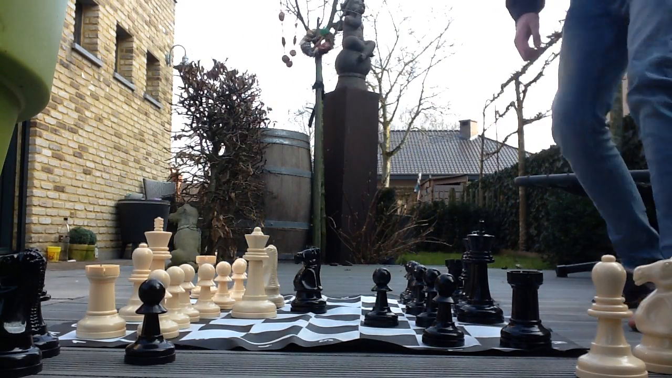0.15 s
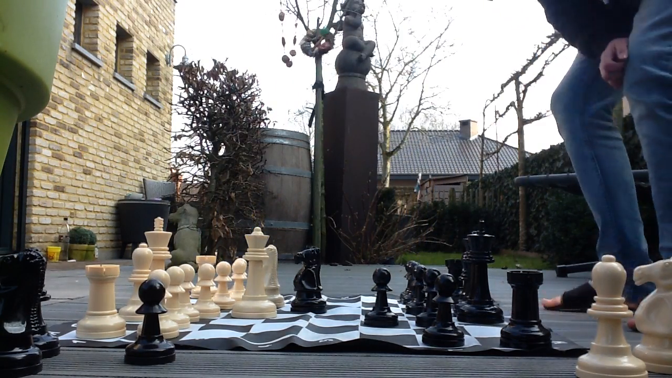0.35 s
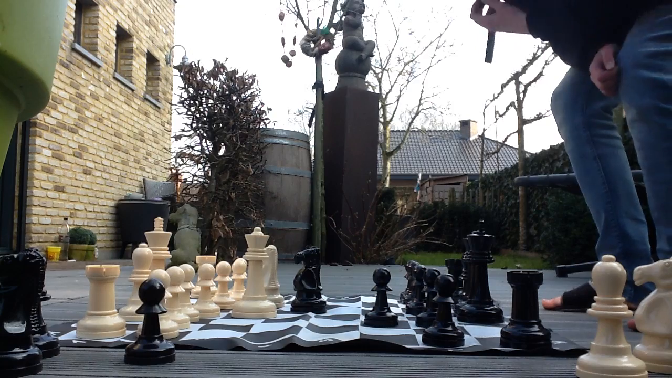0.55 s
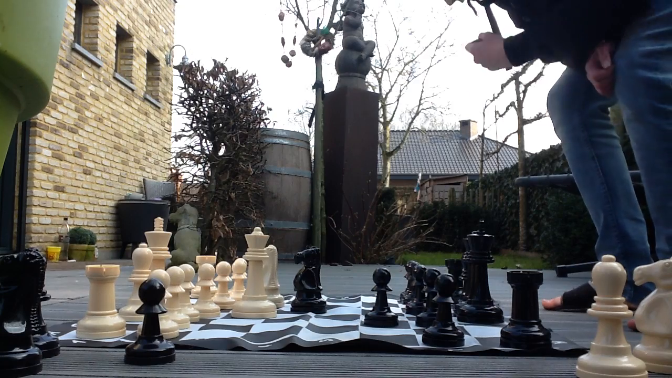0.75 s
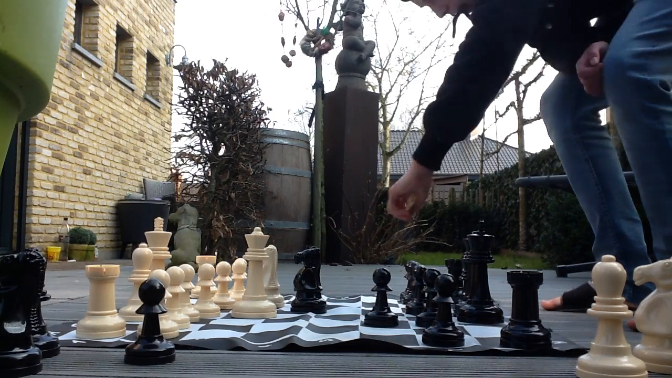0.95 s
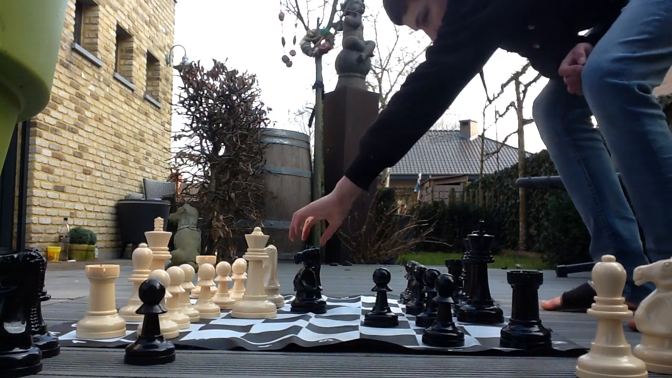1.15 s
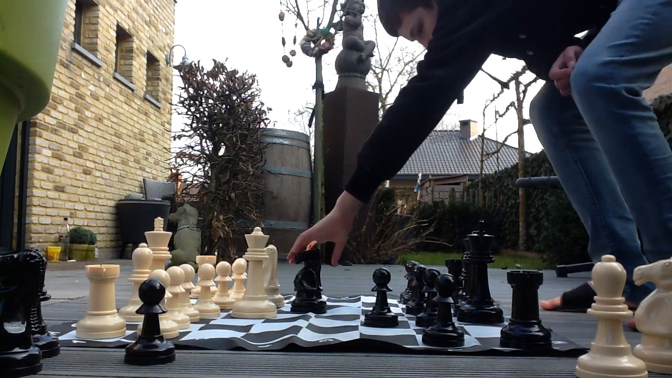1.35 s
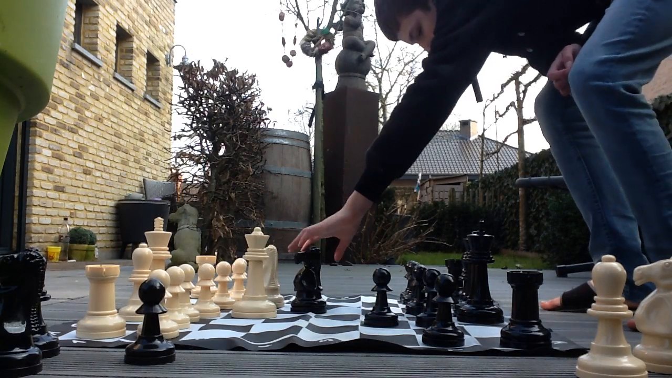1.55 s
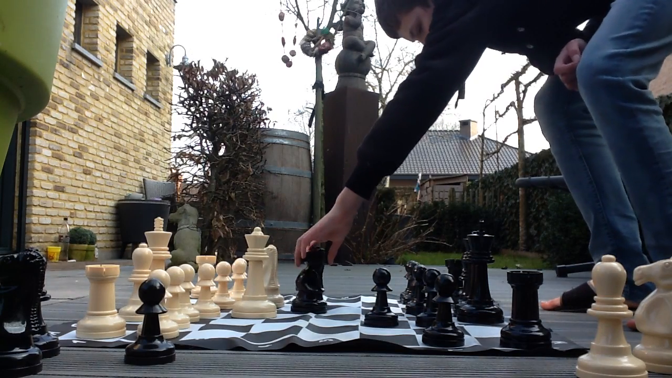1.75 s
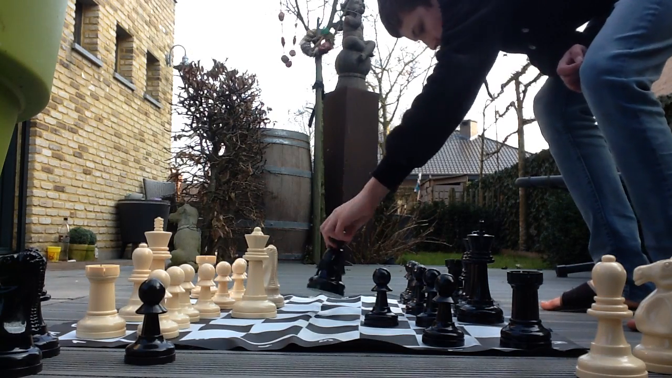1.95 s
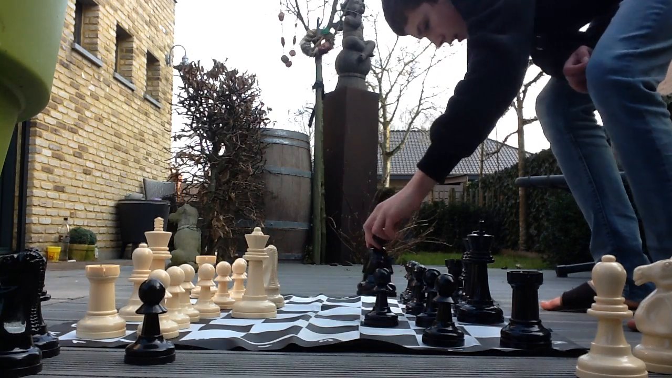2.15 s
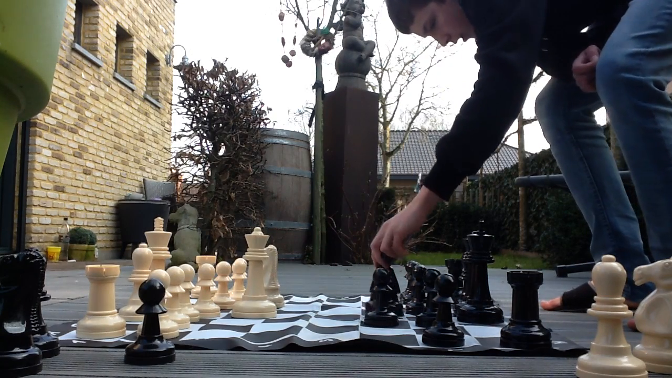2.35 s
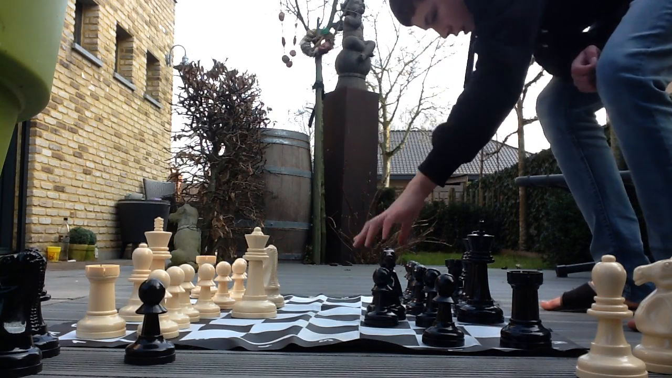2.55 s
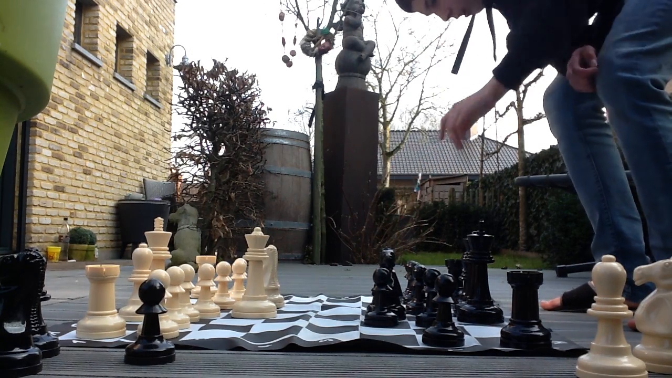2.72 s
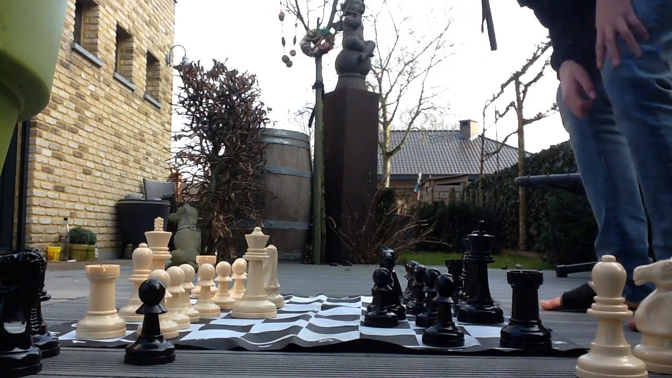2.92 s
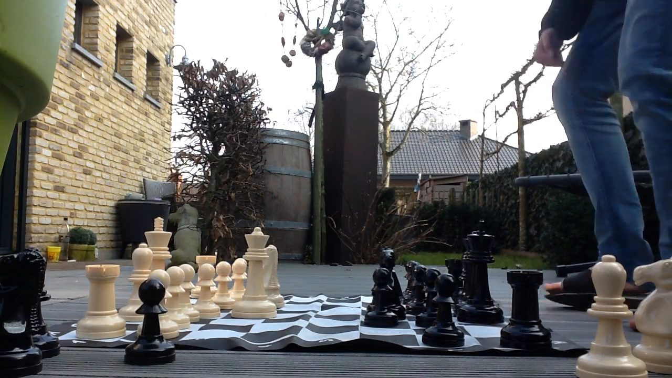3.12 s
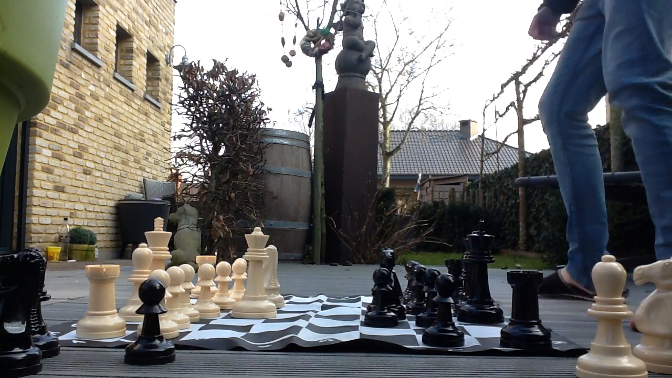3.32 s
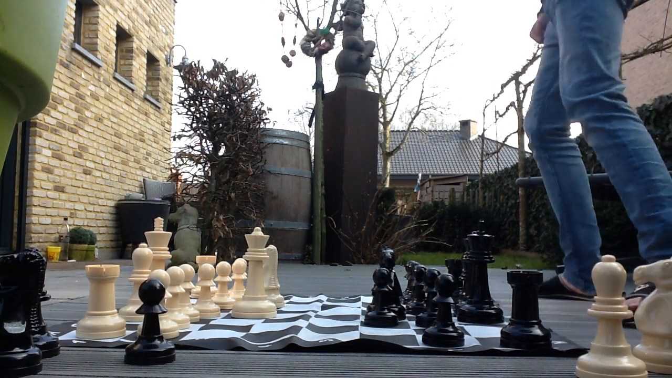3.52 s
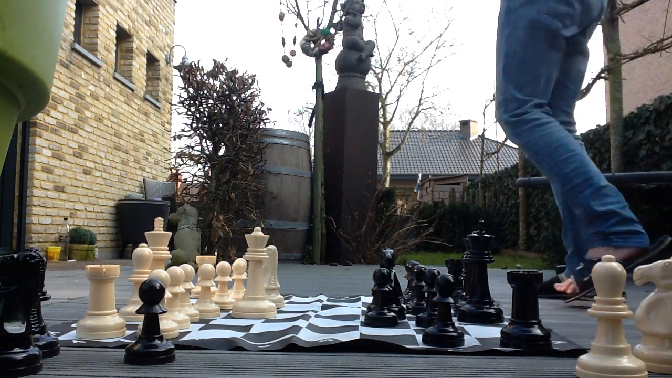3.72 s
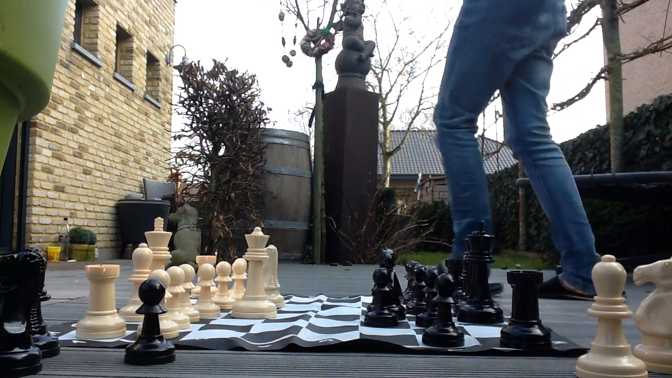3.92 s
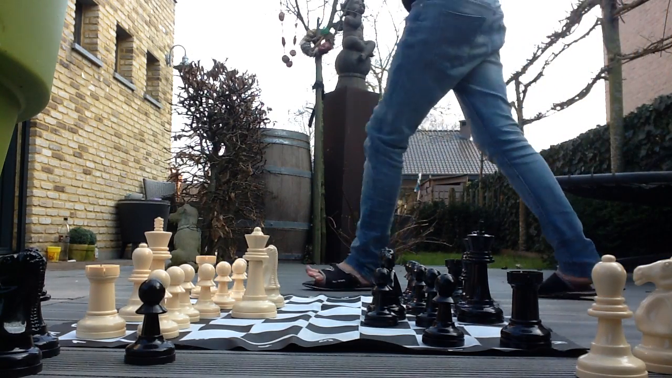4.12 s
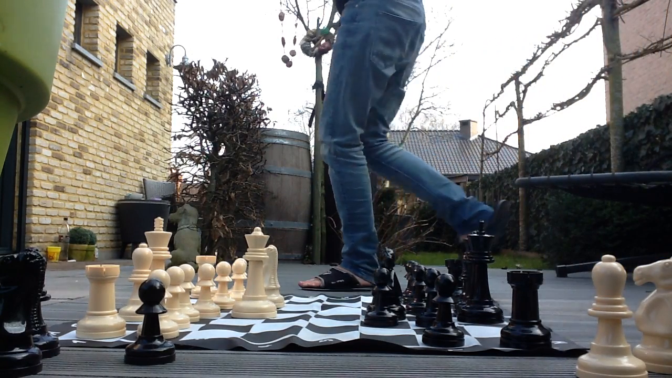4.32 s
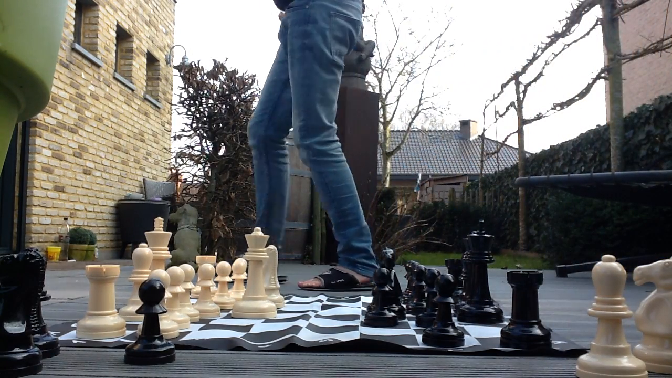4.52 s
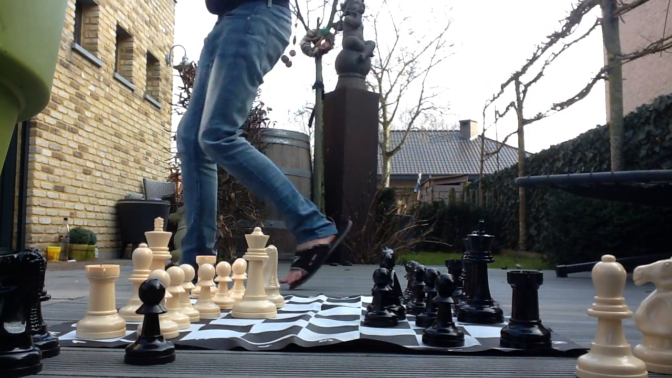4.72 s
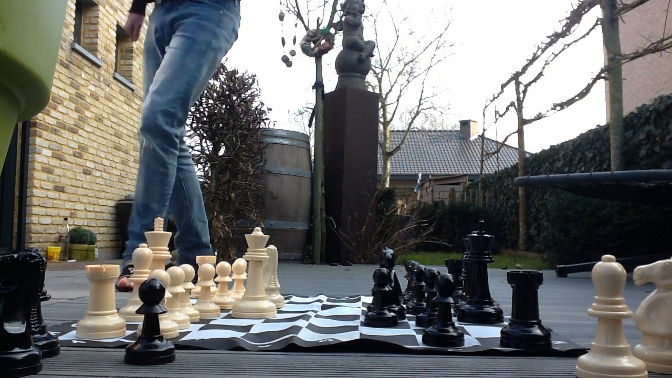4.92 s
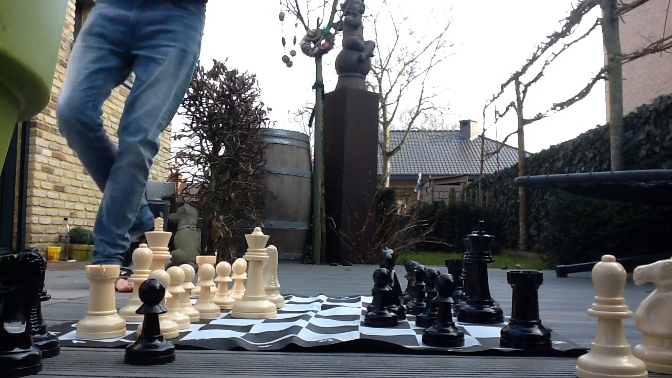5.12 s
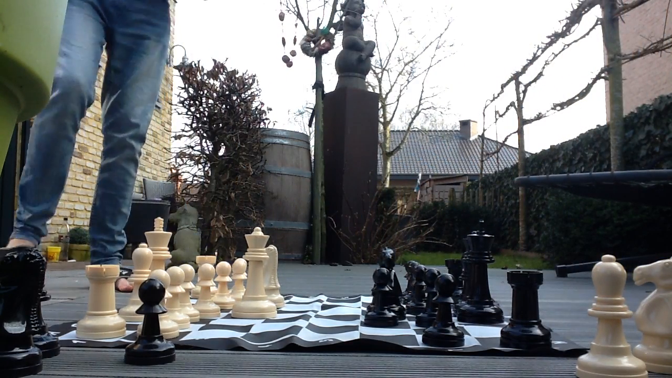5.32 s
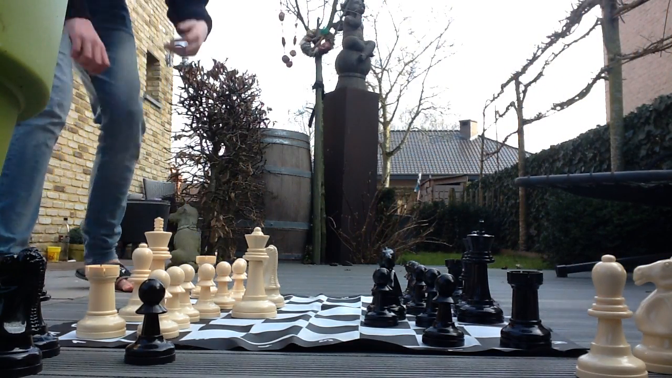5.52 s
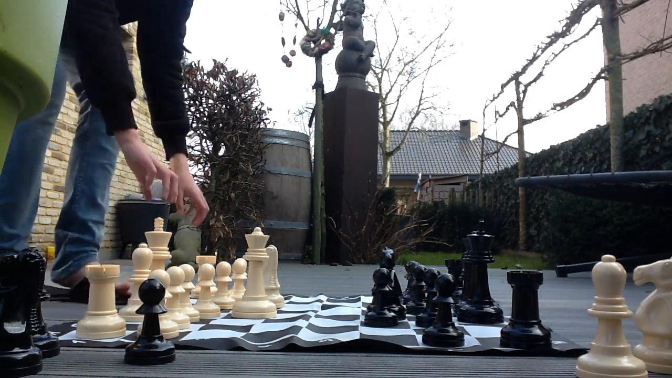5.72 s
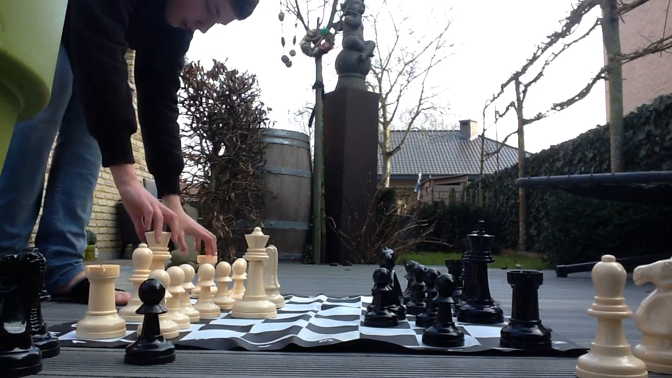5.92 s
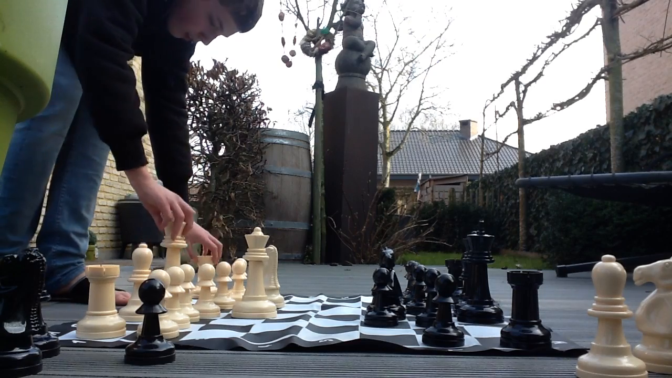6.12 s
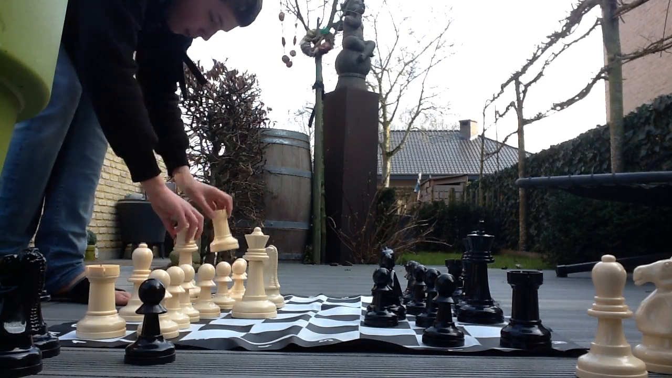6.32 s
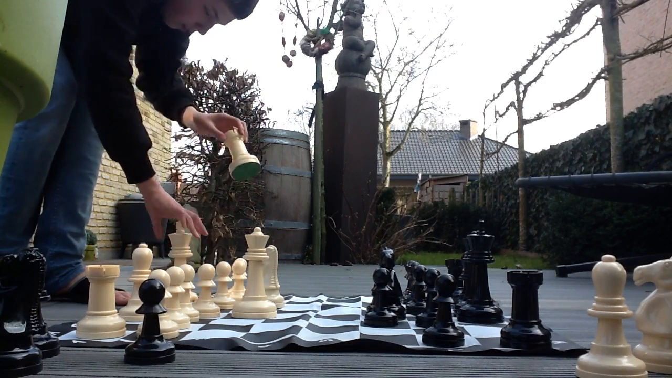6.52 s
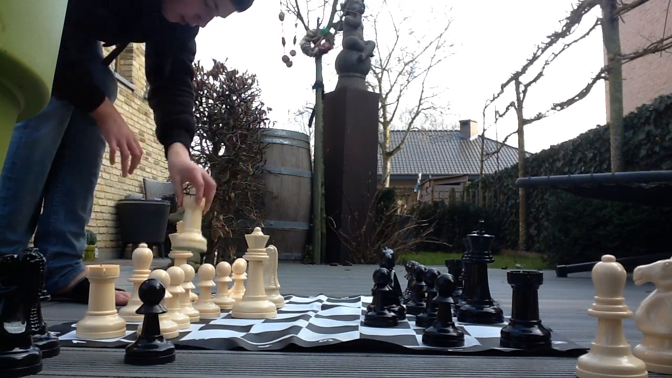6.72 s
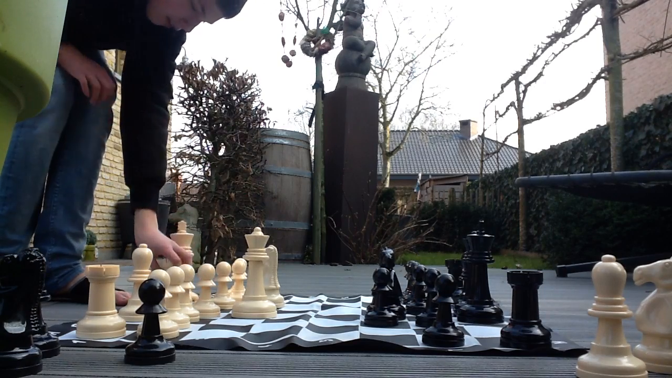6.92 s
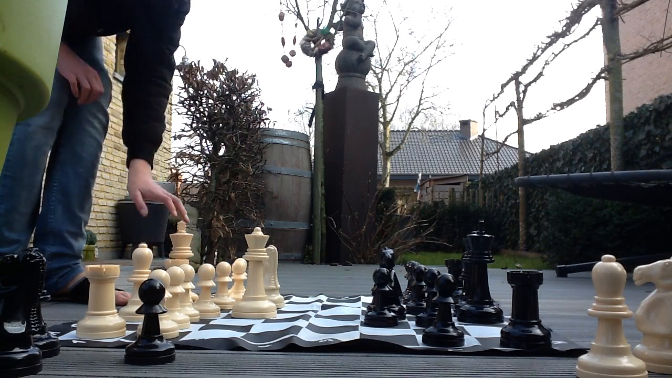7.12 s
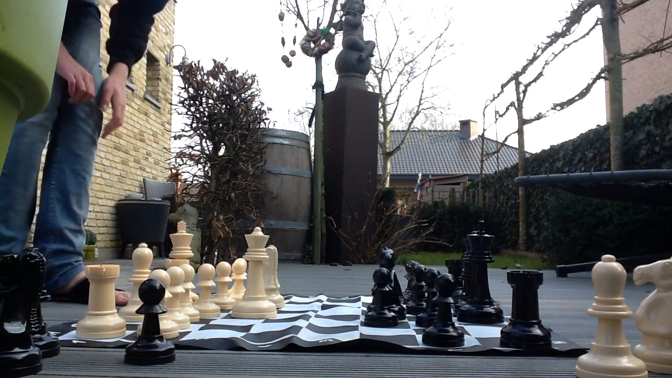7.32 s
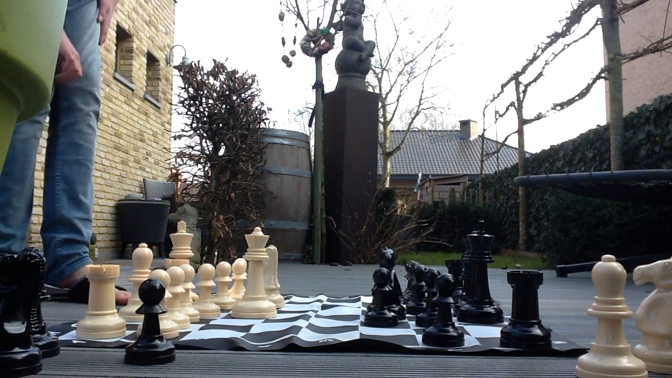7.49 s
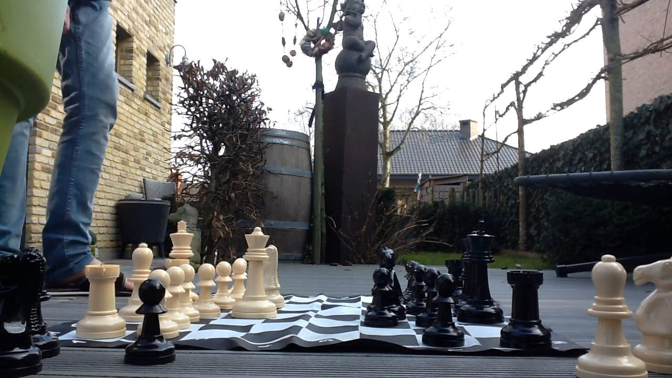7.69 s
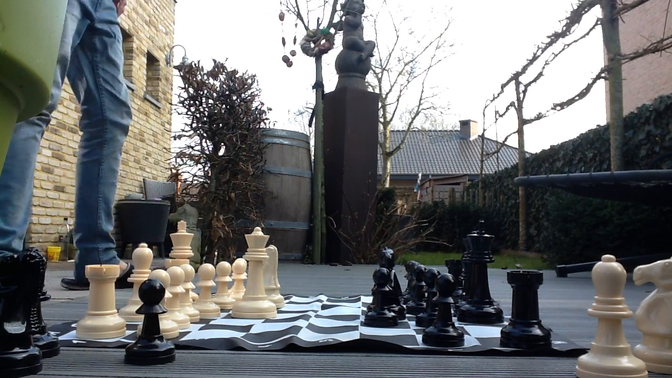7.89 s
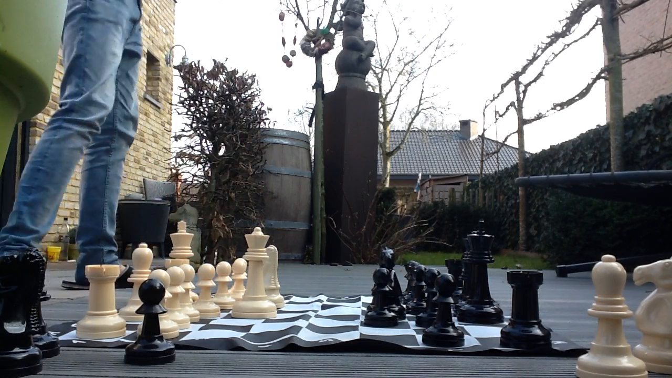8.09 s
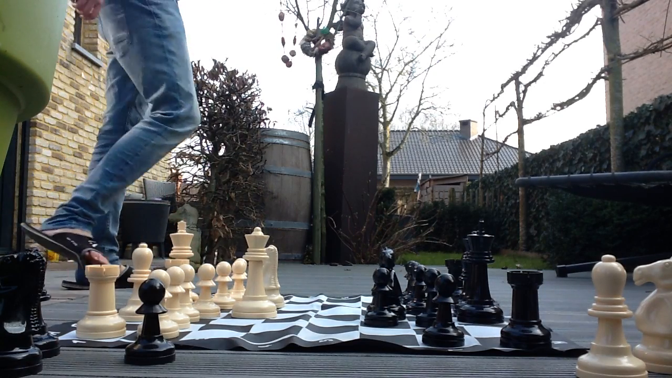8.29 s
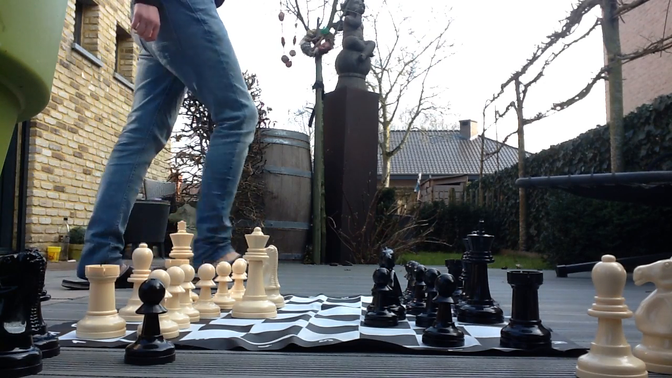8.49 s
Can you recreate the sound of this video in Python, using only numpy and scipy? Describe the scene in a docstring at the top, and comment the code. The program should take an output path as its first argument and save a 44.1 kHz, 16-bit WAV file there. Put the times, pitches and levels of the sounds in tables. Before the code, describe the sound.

A soft step and a scuff of slippers sound on wooden decking outdoors, close to the microphone, with a faint low hum that fades by about 1.4 seconds. Light taps follow, then a weighted chess piece lands with a sharp knock at 2.5 seconds. From 3 to 6 seconds someone walks over the boards: loud, hollow knocks at 3.5 and 4.7 seconds, lighter steps between and after, with scraping soles and small ticks of grit. Each blow has a very short echo. At 6.5 seconds another piece thuds down hard, and at 6.9 seconds hollow plastic pieces clack together with a bright crack and brief ring. A quiet slide comes near 7.4 seconds, then soft scuffs and taps until about 8.5 seconds. Faint distant traffic and a light hiss lie underneath throughout.

```python
"""Slippered steps and weighted pieces knock on wooden decking as someone walks round a garden chess set.
The microphone is close, in a camera standing on the boards. Each blow slaps the surface and sets the
planks ringing; soles scuff, grit ticks, hollow plastic pieces slide and one clacks against another.
A brick wall and fences answer the blows. Behind it all far traffic drones, a low hum fades early on
and the microphone hisses."""
import sys
import numpy as np
from scipy import signal
from scipy.fft import rfft, irfft, next_fast_len
from scipy.io import wavfile
from scipy.ndimage import uniform_filter1d, map_coordinates

SR = 44100
rng = np.random.default_rng(int(sys.argv[2]) if len(sys.argv) > 2 else 0)


def dump_mix(stems):
    """Bounce the given channels to the path in sys.argv[1] as a 16-bit WAV at rate SR."""
    frames = np.atleast_2d(stems).T  # one column per channel
    limited = np.clip(frames, -1, 1)  # hard clip at full scale
    pcm = np.round(limited * 32767).astype(np.int16)
    wavfile.write(sys.argv[1], SR, pcm)


N = 377099


def deck_knocks():
    """Soles and pieces land close by: the surface slaps, the board thuds and the planks rumble on."""
    # blows on the deck; slap, rumble and overtone are relative to the thud:
    # start_s, level_db, pitch_hz, t60_s, slap_db, rumble_db, overtone_hz, overtone_db
    knocks = [ (0.383, -22.5, 285, 0.056, -10, -4.5, 662, -7), (1.404, -40, 384, 0.043, -8, 1.5, 503, -9),
              (1.952, -37, 386, 0.028, -9, -15, 482, -2), (2.4714, -25, 333, .03, -12, -4, 529, -10),
              (2.477, -9, 345, 0.015, -13.5, -9, 505, -10.5), (2.4871, -14, 341, 0.039, -23, -17, 200, -3),
              (3.407, -34.5, 275, 0.035, -10, -11, 556, -17),
              (3.4688, -2, 309.3, 0.042, -16.5, -12, 515.4, -7.5),
              (4.039, -25, 313.6, 0.066, -12, -4, 507, -2), (4.367, -41, 297, 0.032, -8, -7, 947, -2),
              (4.637, -27.5, 301, 0.019, -17.5, -14, 490, -13), (4.731, -34, 319, .03, 4, -9, 553, -5),
              (4.7355, -7, 316, 0.085, -26, -12, 548, -1.5), (4.7433, -16.5, 319, 0.057, -14, -5, 673, 1.5),
              (5.009, -38, 320, .03, 0, -15, 555, -7), (5.013, -18.5, 324.5, 0.035, -7.5, -5, 506.5, -2),
              (5.2467, -30, 237, .032, -15, -4, 585, -11), (5.318, -37, 270, 0.037, -11, -2, 561, -11),
              (5.496, -26.5, 271, 0.028, -4, -8, 520, -6), (5.585, -36.5, 449, 0.039, -4, -2, 511, -15),
              (5.805, -40.5, 490, 0.064, -2, 1, 627, -7), (5.8437, -24.5, 267.6, .044, -3, -4, 628, -3),
              (6.452, -27.5, 248, 0.04, -5, -24, 490, -18),
              (6.4558, -4, 244.5, 0.043, -11, -10.5, 500, -13),
              (6.501, -23, 263, 0.062, -31, -21, 654, -25), (6.941, -3.5, 383, 0.017, -9, -6, 792, -3),
              (7.4147, -30.5, 496, 0.063, -12.5, -24, 578, -21),
              (7.922, -39, 215, 0.04, -19.5, -11, 501, -17), (8.0, -40.5, 309.5, 0.067, -6, -3, 950, 0),
              (8.051, -34, 470, 0.046, -20, 4, 632, -18)]
    # resonances of the planks: centre_hz, width_hz, level_db
    plank_modes = [(223, 126, 5.5), (321, 119, 3), (425, 42, -2.5), (583, 230, -20), (619, 17, -5),
                   (828, 390, -14.5), (1010, 260, -14.5), (1540, 150, -27.5), (1970, 250, -24)]
    contact_s, slap_lead_s, slap_hz = 0.0013, 0.0014, 1120

    def wood(f):
        """The planks' resonances, summed with alternating sign."""
        return sum((-1) ** k * amp(db) * band(hz, width)(f)
                   for k, (hz, width, db) in enumerate(plank_modes))

    out, t = np.zeros(N + SR), np.arange(SR // 2) / SR
    bent_t = t + 0.0013 * (1 - np.exp(-t / 0.00076))  # bending waves: the high pitches arrive first
    contact = (1 - np.exp(-t / contact_s)) ** 2
    for start_s, level_db, pitch_hz, t60_s, slap_db, rumble_db, overtone_hz, overtone_db in knocks:
        fundamental = amp(-60 * t / t60_s) * np.sin(2 * np.pi * pitch_hz * bent_t)
        overtone = amp(overtone_db - 60 * t / 0.027) * np.sin(2 * np.pi * overtone_hz * bent_t)
        thud = contact * (fundamental + overtone)
        rumble = filtered(amp(-60 * t / 0.18) * rng.standard_normal(len(t)), wood)
        body = thud / abs(thud).max() + amp(rumble_db) * contact * rumble / abs(rumble).max()
        slap = burst(t, t60_s=0.03, hz=slap_hz, width_hz=1.29 * slap_hz, rise_s=0.0011)
        add(out, start_s, amp(level_db + slap_db) * slap)
        add(out, start_s + slap_lead_s, amp(level_db) * body)
    return out[:N]


def piece_clack():
    """Hard plastic meets plastic: a short snap, a bright crack, then the hollow shell rings."""
    # piece against piece: start_s, level_db
    clacks = [(6.928, -6)]
    # modes of the hollow shell: pitch_hz, level_db, t60_s
    shell_modes = [(559, -18.5, 0.84), (721, -6.5, 0.1), (835, -22, 0.11), (1240, -29.5, 0.075),
                   (1428, -5.5, 0.13), (1913, -5, 0.22), (2025, -17, 0.2), (2760, -25, 0.207),
                   (4095, -7, 0.1), (5440, -5, 0.035), (6120, -13, 0.04), (7000, -25, 0.13),
                   (8210, -42, .12)]
    out, t = np.zeros(N + SR), np.arange(SR // 2) / SR
    for start_s, level_db in clacks:
        snap = np.sin(np.pi * np.minimum(t / 0.0026, 1)) * np.sin(2 * np.pi * 1150 * t)
        crack = amp(-8) * burst(t, t60_s=0.026, hz=5200, width_hz=4200)
        crack += amp(-16.5) * burst(t, t60_s=0.01, hz=12500, width_hz=8520)
        shell = amp(-11) * shell_ring(shell_modes, t, blur_rad=0.09)
        add(out, start_s, amp(level_db) * (1.26 * snap + crack + shell))
    return out[:N]


def shell_ring(modes, t, blur_rad):
    """Dying modes whose phases wander, as close pairs in a moulded shell do."""
    drifts = blur_rad * np.cumsum(rng.standard_normal((len(modes), len(t))), axis=1)
    return sum(amp(db - 60 * t / t60_s) * np.sin(2 * np.pi * hz * t + drift)
               for (hz, db, t60_s), drift in zip(modes, drifts))


def sole_scuffs():
    """Rubber drags over gritty wood: grainy hiss with a moving peak, a bright edge and a rasp."""
    # strokes of sole and cloth; the edge is relative to the hiss:
    # full_at_s, rise_s, hold_s, fall_s, hiss_db, edge_db, rasp_db
    drags = [ (0.118, 0.21, 0.15, .1, -46.5, -6.5, -49.5), (0.166, 0.066, 0.016, 0.037, -37.5, -7, -44),
             (0.192, 0.0296, .002, .025, -34.5, -12, -40), (0.385, 0.059, .002, 0.082, -40, -10, -40.5),
             (0.46, .1, 0.27, .16, -59, -8, -61), (1.1, .3, 0.19, 0.23, -68.5, 1.5, -75),
             (1.354, 0.033, 0.0013, .04, -64, -12, -48), (1.904, 0.022, 0.0022, .035, -47, -9.5, -53.5),
             (1.957, 0.062, .002, .04, -58, -8, -46), (2.48, .01, .004, 0.029, -47.5, -7, -70),
             (2.51, .02, 0.062, .03, -63, -5, -75), (2.937, .015, .002, 0.13, -57, 1.5, -75),
             (3.014, .05, 0.0019, 0.35, -55.5, -9, -65), (3.171, 0.038, 0.0018, 0.08, -51, -11.5, -70),
             (3.232, .055, .002, .05, -47, -12.5, -65), (3.41, .012, .002, 0.038, -52.5, -10, -65),
             (3.463, 0.054, .002, 0.013, -43, -10, -44), (3.472, 0.006, 0.0015, 0.015, -35, -17, -50),
             (3.483, .01, 0.0016, .18, -48, -14, -52), (3.56, .05, .07, .05, -57, -9, -57),
             (3.664, 0.063, 0.0026, 0.087, -45.5, -2.5, -65),
             (3.945, 0.019, 0.0021, 0.058, -59.5, -10.5, -67),
             (4.046, 0.0077, 0.0018, 0.087, -48, -11, -54), (4.131, .09, 0.042, 0.15, -51.5, -7, -53.5),
             (4.316, 0.13, 0.0021, 0.048, -60, -10, -55), (4.365, .012, 0.0018, 0.086, -51.5, -14, -54),
             (4.377, 0.0067, 0.0021, 0.047, -69, -14, -46.5), (4.545, .03, 0.045, 0.052, -52, -1, -72),
             (4.641, 0.015, 0.098, .01, -53.5, -9, -68), (4.752, 0.023, .002, 0.026, -50.5, -19, -55),
             (4.812, 0.088, 0.028, 0.05, -54, -1.5, -47), (4.98, 0.01, 0.0019, 0.026, -55, -8, -70),
             (5.019, 0.023, 0.06, 0.087, -43, -7, -43), (5.178, 0.055, 0.0018, .07, -49, -13, -59),
             (5.262, .03, 0.041, .05, -53.5, -11, -56), (5.319, .03, .09, 0.31, -46, -5, -56),
             (5.355, 0.085, .002, 0.027, -60, -5, -38.5), (5.468, .05, 0.14, .035, -40.5, -0.5, -47.5),
             (5.693, 0.1, 0.0017, .05, -52, -8.5, -51), (5.746, 0.0091, 0.0022, 0.096, -63, 2, -68),
             (5.817, 0.0095, .04, 0.07, -47, -6, -41), (5.921, 0.023, .12, 0.38, -68, 1, -62),
             (7.44, 0.027, .2, .2, -56.5, -4, -60.5), (7.66, .055, 0.0021, 0.026, -66, -2, -53.5),
             (8.004, 0.0089, 0.0024, 0.086, -66, -4.5, -51), (8.026, .165, .002, .09, -50.5, -4.5, -60),
             (8.146, .065, .03, 0.089, -56, -10, -59), (8.236, 0.036, 0.0024, 0.1, -55.5, 5.5, -55),
             (8.313, .05, .11, 0.19, -67, -2, -73.5), (8.545, 0.16, 0.0091, .1, -56.5, -2, -55)]
    # hiss of the sole: frequency_hz, density_db
    sole_spectrum = [(1470, -7), (2500, -3), (3120, -2.5), (3720, -0.5), (4570, -2), (5050, -4.5),
                     (6340, -1), (7860, -1.5), (15500, -13)]
    # fine hiss of the sole's edge: frequency_hz, density_db
    edge_spectrum = [(5000, -24), (9000, -9), (15500, -9)]
    # the lower, coarser rasp: frequency_hz, density_db
    rasp_spectrum = [(250, -5.5), (600, -10.5), (1600, -9), (2800, -13), (4500, -19)]
    slow_hz, fast_hz, fast_stroke_db = 1215, 1880, -39
    gain, blend = strokes(drags)
    hiss_db, edge_db, rasp_db = np.transpose(drags)[4:]
    hiss_gain, brightness_db = gain(hiss_db), blend(hiss_db, edge_db)
    grit = narrow_noise(5710 + 110 * brightness_db, width_ratio=0.12)  # its peak climbs with the edge
    sole = noise(sole_spectrum, grain_db=1.5)
    edge = amp(brightness_db) * noise(edge_spectrum, grain_db=1.0)
    speed = np.sqrt(np.minimum(hiss_gain / amp(fast_stroke_db), 1))  # a louder stroke is a faster one
    rub = narrow_noise(slow_hz + (fast_hz - slow_hz) * speed, width_ratio=0.12)
    hiss = patchy(0.79 * sole + 0.31 * grit + edge, depth_db=2.0)
    rasp = 0.46 * noise(rasp_spectrum, grain_db=4.0, grain_hz=76) + 0.32 * rub
    return hiss_gain * hiss + gain(rasp_db) * rasp


def grit_ticks():
    """Grit and straps tick: short dry cracks, a wide band each. The loudest, at 3.47 s, is the sharp crack of
    the heavy blow landing then."""
    # small cracks: start_s, level_db, centre_hz
    ticks = [(1.3492, -44, 3450), (1.8913, -47, 4260), (1.953, -47, 2600), (2.486, -29.5, 7000),
             (2.9377, -42, 9390), (3.1745, -38, 4150), (3.217, -38, 3820), (3.4386, -40, 3920),
             (3.4723, -16, 1800), (3.9501, -47, 4200), (4.0437, -39.5, 2550), (4.1295, -39, 3080),
             (4.2715, -52, 4140), (4.312, -44, 3093), (4.366, -40.5, 4300), (4.5313, -50, 8310),
             (4.64, -40, 5270), (4.7457, -40, 2500), (4.7495, -32.5, 3600), (4.8088, -40.5, 3906),
             (5.0216, -34.5, 2500), (5.173, -39, 5030), (5.2094, -43.5, 2544), (5.6884, -42.5, 2624),
             (5.7487, -41, 9000), (5.815, -32, 8290), (5.9583, -42, 12800), (6.0345, -42.5, 10500),
             (5.706, -45, 13500), (6.1105, -47, 13800), (7.438, -47, 5170), (8.002, -39, 1150),
             (8.2179, -23.5, 12830)]
    out, t = np.zeros(N + SR), np.arange(SR // 20) / SR
    for start_s, level_db, centre_hz in ticks:
        add(out, start_s, amp(level_db) * burst(t, t60_s=0.012, hz=centre_hz, width_hz=1.07 * centre_hz))
    return out[:N]


def piece_slides():
    """A base rubbing on the mat sounds the cavity above it, in uneven slips."""
    # hollow pieces slid and handled: full_at_s, rise_s, hold_s, fall_s, level_db, cavity_hz
    slides = [(1.408, 0.033, 0.061, 0.034, -49, 560), (1.5, .1, .05, .03, -55, 534),
              (5.313, .018, 0.0022, 0.095, -44.5, 530.7), (6.072, 0.039, .15, 0.036, -54, 563.6),
              (7.417, 0.0053, .002, .18, -39, 525), (7.547, 0.11, 0.065, .3, -54.5, 574.4),
              (8.496, 0.019, .05, 0.099, -55.5, 440)]
    gain, blend = strokes(slides)
    level_db, cavity_hz = np.transpose(slides)[4:]
    slips = amp(1.2 * wobble(40))
    return gain(level_db) * slips * narrow_noise(blend(level_db, cavity_hz), width_ratio=0.32)


def camera_jolts():
    """A weighted piece lands and the planks give the camera one push and a rebound."""
    # jolts through the boards: start_s, level_db
    jolts = [(2.476, -40), (6.46, -38)]
    push_s = 0.0018
    out, age = np.zeros(N + SR), np.arange(SR // 10) / SR / push_s
    push = np.e * age * np.exp(-age) * (1 - age / 2)
    for start_s, level_db in jolts:
        add(out, start_s, amp(level_db) * push)
    return out[:N]


def garden_echo(x):
    """The brick wall and fences answer about 9 ms later, each frequency dying at its own speed."""
    # decay of the garden: frequency_hz, t60_s
    decay_times = [(200, 0.36), (1000, 0.25), (3000, 0.31), (6000, 0.23), (12000, 0.13)]
    hz, t, spectra = signal.stft(rng.standard_normal(SR // 2), SR, nperseg=256)
    decay = amp(-60 * t / along(decay_times, hz)[:, None])
    tail = signal.istft(spectra * decay, SR, nperseg=256)[1]
    return signal.fftconvolve(np.pad(x, (400, 0)), tail / np.linalg.norm(tail))[:N]


def low_hum():
    """A low wavering hum that fades early, with a knock's low ring at 0.4 s."""
    # the hum and the knock's ring: time_s, level_db, pitch_hz
    course = [(0.0, -56, 227.6), (0.3, -55.5, 240), (0.404, -40, 253.3), (0.556, -56, 228),
              (1.1, -55.5, 233), (1.4, -85, 230)]
    level_db, pitch_hz = curves(course)
    return amp(level_db) * narrow_noise(pitch_hz, width_ratio=0.11)


def open_air():
    """Far traffic wavers and slowly fades; a little breeze touches the microphone, which hisses."""
    # background levels: time_s, drone_db, tyre_db, breeze_db
    levels = [(0.0, -47, -47, -81), (0.5, -50, -50.5, -84), (1.14, -55.5, -53, -87),
              (2.52, -54.5, -58, -81), (2.86, -57, -57.5, -94), (5.31, -57.5, -59, -94),
              (6.64, -54, -61, -89.5), (7.0, -56.5, -60.5, -100), (8.55, -55.5, -65.5, -100)]
    # drone of far traffic: frequency_hz, density_db
    drone_spectrum = [(35, -58), (60, -26), (130, -2.5), (173, 3.5), (236, 3), (340, -3.5), (500, -10),
                      (600, -9.5), (780, -25), (1320, -120)]
    # rush of far tyres: frequency_hz, density_db
    tyre_spectrum = [(260, -38.5), (450, -0.5), (691, -3.5), (1020, -1), (1360, -5), (2000, -15),
                     (2180, -16), (2710, -25.5), (3500, -24.5), (4550, -56.5), (7700, -120)]
    # breeze on the microphone: frequency_hz, density_db
    breeze_spectrum = [(25, -19.5), (48, -1), (70, -8.5)]
    # the microphone's own noise: frequency_hz, density_db
    hiss_spectrum = [(1180, -19), (2000, -8.5), (2590, -11.5), (2870, -12.5), (3490, -10), (10600, -11),
                     (15500, -12.5)]
    drone_db, tyre_db, breeze_db = curves(levels)
    drone = amp(drone_db + 1.13 * wobble(3.6)) * noise(drone_spectrum)
    tyres = amp(tyre_db + 0.8 * wobble(4)) * noise(tyre_spectrum)
    breeze = amp(breeze_db + 3.03 * wobble(7.2)) * noise(breeze_spectrum)
    return drone + tyres + breeze + amp(-64) * noise(hiss_spectrum)


def strokes(rows):
    """Rubbing strokes rise, hold and fall: gain sums them in power, blend averages a column by power."""
    span_db = 20  # a stroke drops this far in each fall_s
    t = np.arange(int(1000 * N / SR) + 2) / 1000  # millisecond steps
    full_at_s, rise_s, hold_s, fall_s = abs(np.transpose(rows)[:4, :, None])
    floor = amp(-span_db)
    swell = amp(span_db * np.minimum(t - full_at_s, 0) / rise_s)
    fade = amp(-span_db * np.maximum(t - full_at_s - hold_s, 0) / fall_s)
    shape = np.maximum(swell - floor, 0) / (1 - floor) * fade
    per_sample = lambda curve: np.interp(np.arange(N) / SR, t, curve)
    power = lambda db: (shape * amp(db)[:, None]) ** 2 + 1e-20
    gain = lambda db: per_sample(np.sqrt(power(db).sum(axis=0)))
    blend = lambda db, column: per_sample(column @ power(db) / power(db).sum(axis=0))
    return gain, blend


def burst(t, t60_s, hz, width_hz, rise_s=0.00025):
    """Dying noise through a steep band, peak 1."""
    puff = amp(-60 * t / t60_s) * (1 - np.exp(-t / rise_s)) * rng.standard_normal(len(t))
    x = filtered(puff, lambda f: band(hz, width_hz)(f) ** 3)
    return x / abs(x).max()


def noise(spectrum, grain_db=0, grain_hz=300):
    """Coloured noise of rms 1, its level shaken by grain_db, grain_hz times a second."""
    tapered = [(spectrum[0][0] * 0.7, -90), *spectrum, (spectrum[-1][0] * 1.4, -90)]
    grainy = rng.standard_normal(N) * amp(grain_db * wobble(grain_hz))
    x = filtered(grainy, lambda hz: amp(along(tapered, hz)))
    return x / np.std(x)


def narrow_noise(centre_hz, width_ratio):
    """A band of noise of rms 1 that follows the curve centre_hz."""
    lowpass = lambda f: 1 / (1 + 1j * f / (width_ratio * np.mean(centre_hz))) ** 2
    slow = [filtered(rng.standard_normal(N), lowpass) for _ in range(2)]
    phase = 2 * np.pi * np.cumsum(centre_hz) / SR
    x = slow[0] * np.cos(phase) + slow[1] * np.sin(phase)
    return x / np.std(x)


def patchy(x, depth_db):
    """x with random louder and softer patches in time and pitch, rms 1."""
    spectra = signal.stft(x, nperseg=256)[2]
    patches = uniform_filter1d(rng.standard_normal(spectra.shape), size=5, axis=0)
    patches = uniform_filter1d(patches, size=8, axis=1)
    y = signal.istft(spectra * amp(depth_db * patches / patches.std()), nperseg=256)[1][:N]
    return y / np.std(y)


def wobble(rate_hz):
    """A smooth random curve, rate_hz knots a second."""
    knots = rng.standard_normal(int(N * rate_hz / SR) + 4)
    return map_coordinates(knots, [np.arange(N) * rate_hz / SR])


def band(hz, width_hz):
    """The frequency response of one resonance."""
    return lambda f: 1j * f * width_hz / (hz * hz - f * f + 1j * f * width_hz)


def filtered(x, response):
    """x through a complex frequency response."""
    size = next_fast_len(len(x) + SR // 4)
    return irfft(rfft(x, size) * response(np.fft.rfftfreq(size, 1 / SR)), size)[:len(x)]


def along(points, hz):
    """(frequency_hz, value) points interpolated on a log axis."""
    point_hz, values = np.transpose(points)
    return np.interp(np.log(hz + 1), np.log(point_hz + 1), values)


def curves(rows):
    """One value per sample for each column after the time."""
    time_s, *columns = np.transpose(rows)
    return [np.interp(np.arange(N) / SR, time_s, column) for column in columns]


def amp(db):
    """dB to gain."""
    return 10 ** (np.asarray(db) / 20)


def add(track, start_s, x):
    """Mix x in at start_s."""
    track[round(start_s * SR):][:len(x)] += x


def scene():
    """Close blows with their echo and close rubbing, over the far traffic, in mono."""
    blows = deck_knocks() + grit_ticks() + piece_clack()
    echo = amp(-14.5) * garden_echo(blows)
    thin_bass = lambda hz: (1j * hz / (165 + 1j * hz)) ** 3  # boards radiate little deep bass
    near = filtered(blows + echo + piece_slides(), thin_bass) + camera_jolts() + sole_scuffs()
    return (near + low_hum() + open_air())[None]


def record(dry):
    """The camera keeps nothing above its band limit."""
    return filtered(dry[0], lambda hz: hz < 15380)[None]


dry = scene()
out = record(dry)
dump_mix(out)
```